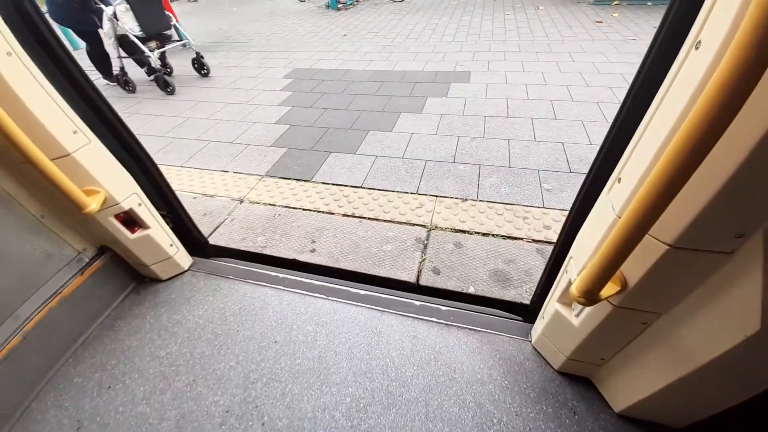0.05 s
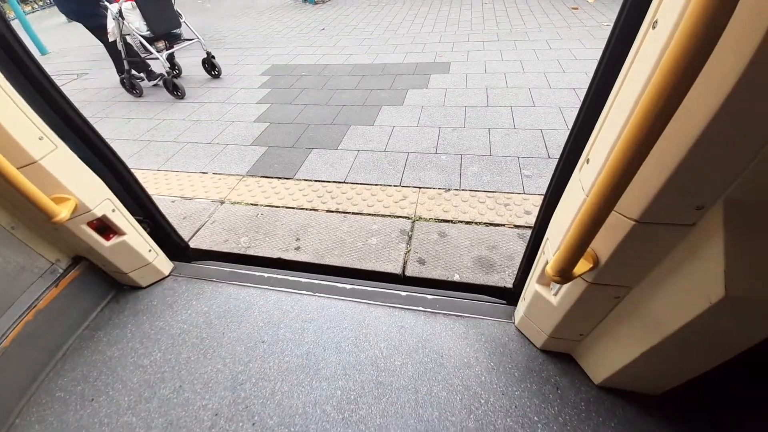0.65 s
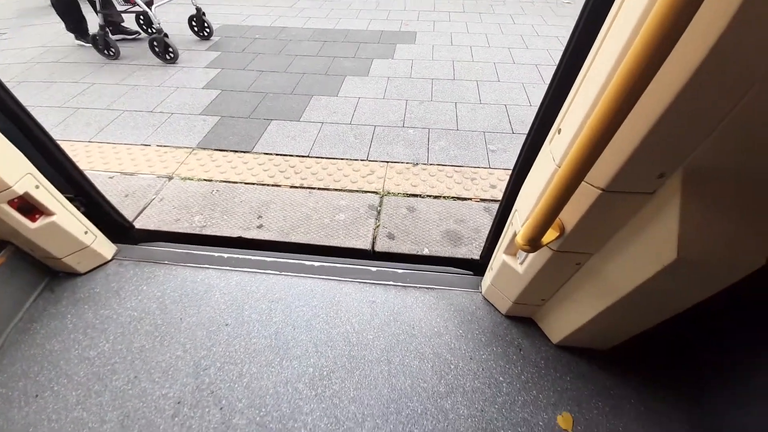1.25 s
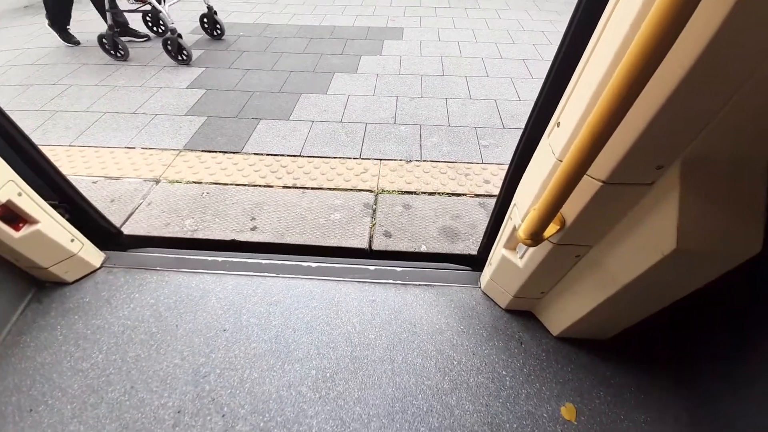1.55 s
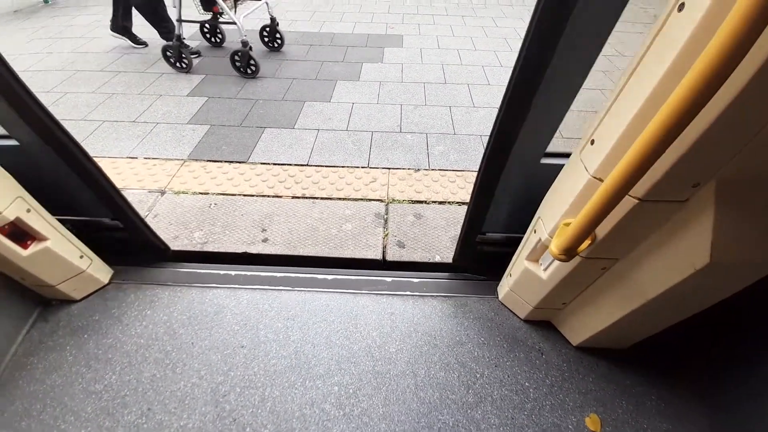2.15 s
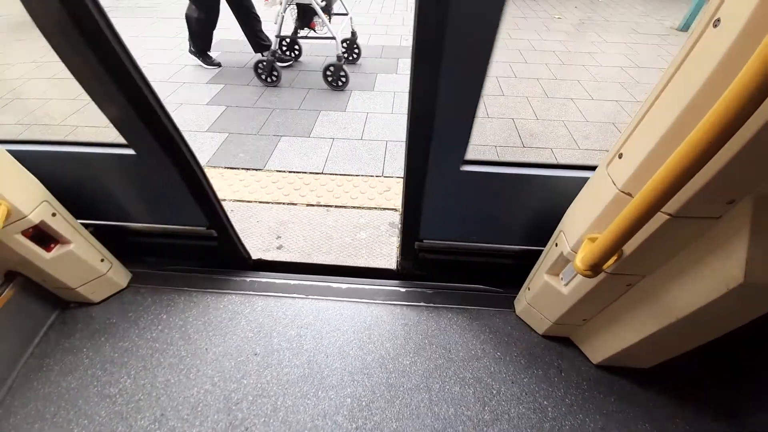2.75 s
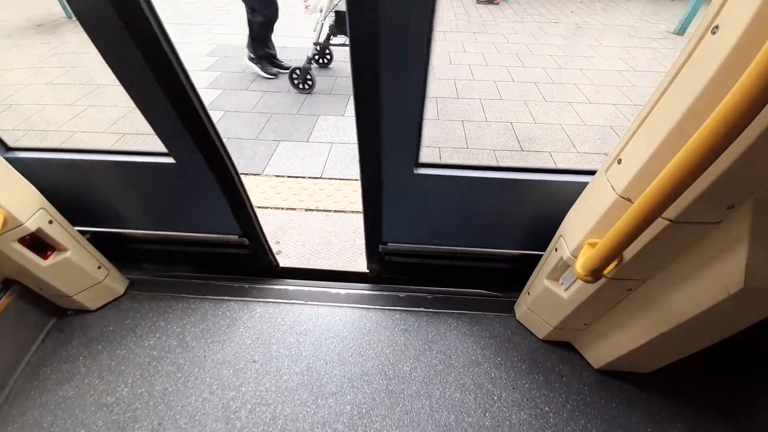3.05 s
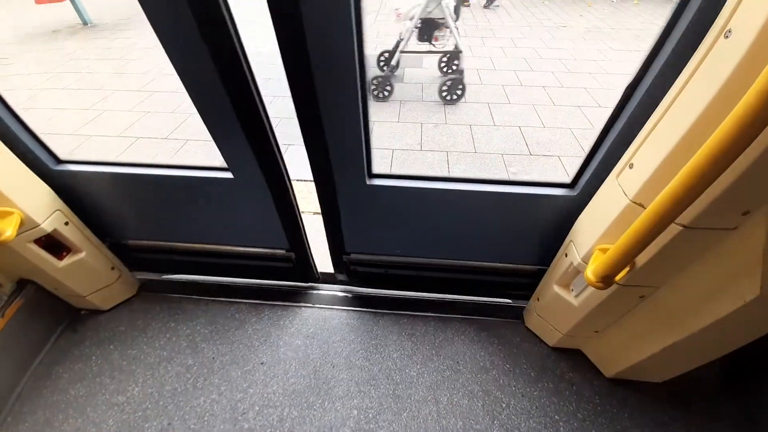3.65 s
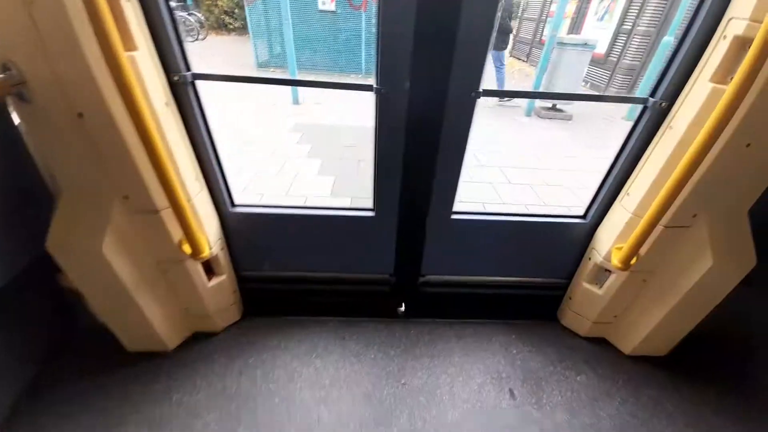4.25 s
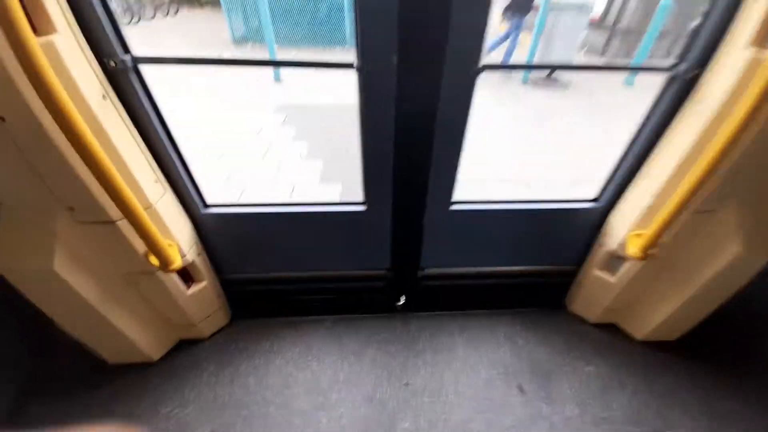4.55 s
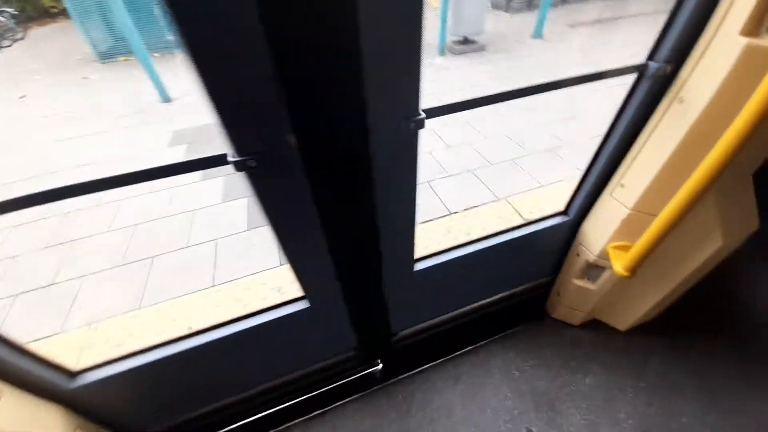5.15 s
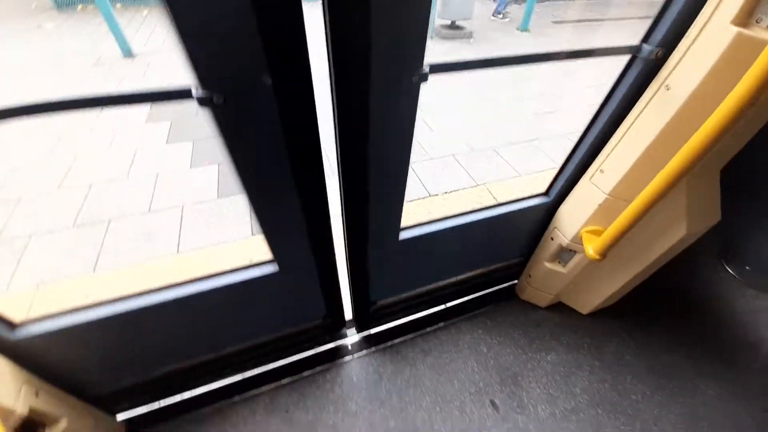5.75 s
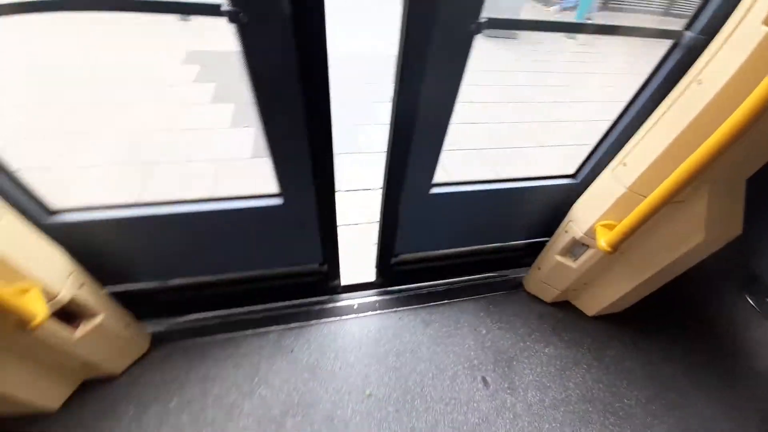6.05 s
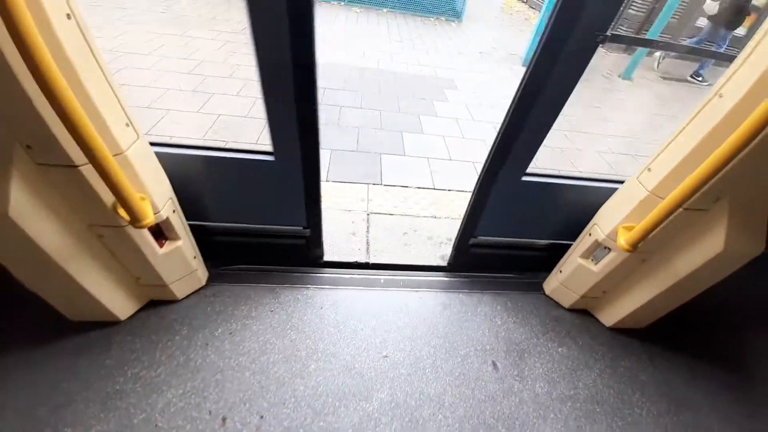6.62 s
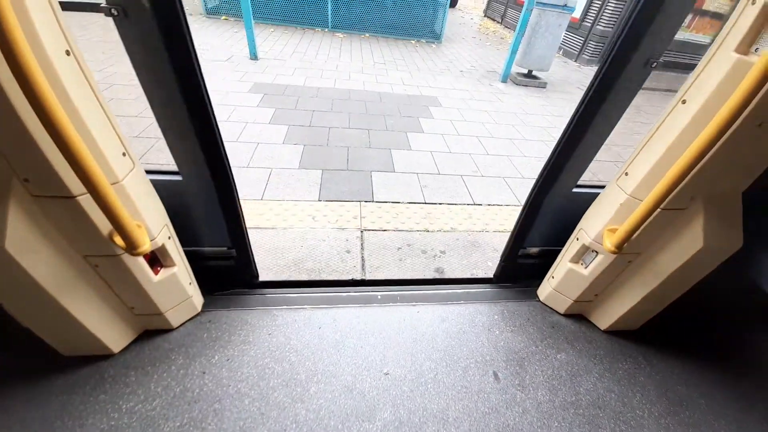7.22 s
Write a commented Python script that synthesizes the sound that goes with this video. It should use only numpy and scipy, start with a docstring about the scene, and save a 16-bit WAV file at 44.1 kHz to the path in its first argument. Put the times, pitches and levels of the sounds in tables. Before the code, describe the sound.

Inside a standing, humming tram, motor-driven doors close with knocks and steel snaps, pause, then unlock and reopen to a final knock.

```python
"""Inside a standing tram, over a low hum and ventilation: the electric doors unlock, roll shut and
pull into their seals with a clatter of steel latches. The slam breaks off abruptly. After a pause the
lock lets go with a thump, and the leaves roll open and knock against their end stops. Blows ring the
leaves, panels and fittings; rollers drum, a guide scrapes, and the seals and loaded drive squeak."""
import sys
import numpy as np
from scipy import signal
from scipy.fft import rfft, irfft, next_fast_len
from scipy.io import wavfile
from scipy.ndimage import uniform_filter1d

SR = 44100
rng = np.random.default_rng(int(sys.argv[2]) if len(sys.argv) > 2 else 0)


def output_pcm(signal):
    """Save a mono or channel-first signal as 16-bit PCM at the path in sys.argv[1].

    Samples are clipped to [-1, 1] before scaling.
    """
    pcm = np.clip(np.atleast_2d(signal).T, -1, 1) * 32767
    wavfile.write(sys.argv[1], SR, np.round(pcm).astype(np.int16))


N = 329868
BREAK_S = 4.123  # the slam cuts off here

# Hits on the door leaves: (time [s], level [dB], hardness [0-1], looseness [dB],
# pitch of the struck fitting [Hz], its ring against the hit [dB])
DOOR_HITS = [(0.45, -48.5, .25, -2, 300, 3), (0.72, -43.5, 0.5, 0, 98, 13),
             (1.396, -31, 0.4, -6, 135, 15.5), (1.397, -40.5, 0.3, -4, 846, 3.5),
             (1.558, -31, 0.72, 3, 1077, -0.5), (1.584, -29.5, 0.7, -4.5, 880, -2),
             (1.609, -30, 0.14, -4, 305, 7.5), (2.549, -38, .5, 4, 610, -4),
             (2.916, -25.5, 0.77, -16, 1110, -5), (2.93, -21, 0.5, -11.5, 598, 0),
             (3.333, -26.5, 0.8, -19, 2110, 10), (3.336, -25, 0.94, 9, 704, 0),
             (3.37, -22, 0.9, 12, 465, -1.5), (3.648, -20, 0.53, 5, 1354, -17),
             (3.739, -27.5, 0.04, 0, 102, -2), (3.776, -19, .72, 1, 912, -4),
             (3.896, -15, 0.83, -8.5, 968, -1), (3.899, -17.5, 0.18, -24, 199, 13),
             (3.904, -33, 0.4, 10, 70, 15), (3.911, -16.5, 0.81, -3.5, 1140, 3.5),
             (3.913, -17, 0.86, 0, 1283, 0), (3.992, -16.5, 0.93, 12, 2077, -12),
             (4.051, -14, 0.73, -5.5, 715, 1.5), (4.056, -26.5, .4, 13, 338, 12.5),
             (4.501, -56.5, 0.16, 13, 94.7, 19.5), (4.617, -43.5, 0.83, -11, 990, -2),
             (5.329, -12.5, 0.49, -5, 284, 4.5), (5.331, -27.5, 1, 1, 3500, -9.5),
             (5.341, -13, 0.49, -3, 340, 0), (5.345, -22.5, 0.23, 6, 111, 9),
             (5.456, -32, 0.93, -12.5, 5570, -5), (5.59, -25, 0.72, -2, 1097, -3),
             (5.731, -29.5, 0.96, -6, 377, 6), (6.809, -16.5, 0.74, -6, 1220, -3.5),
             (6.834, -21.5, 0.56, -7, 287, -7), (7.015, -26, 0.56, -3, 240, 9.5)]
# Tone of the rattling panels: (frequency [Hz], level [dB])
PANEL_TONE = [(40, -13), (70, 3.5), (150, 4.5), (230, 4.5), (330, 9), (520, -4), (1200, -10), (1700, -14),
              (3000, -24.5), (5000, -28.5), (7000, -29), (8300, -40.5), (12500, -36), (16000, -47)]
def knocks(ring_db=-7, tail_db=-6, burst_t60=0.047, attack_s=0.0012, rebound_s=0.028):
    """Each hit and its soft rebound ring the leaf and panels; harder hits trade thud for crack."""
    out, t = np.zeros((2, N)), np.arange(SR // 3) / SR
    edges_hz = [(40, 200), (200, 700), (700, 2500), (2500, 16000)]
    bands = [signal.butter(3, edge, "band", fs=SR, output="sos") for edge in edges_hz]
    transient = t < .03
    rebounds = [(s + rebound_s, db - 10.5, 0.29, -10.5) for s, db, *_ in DOOR_HITS]
    for s, db, hardness, loose_db, *_ in list(DOOR_HITS) + rebounds:
        burst = noise(PANEL_TONE, len(t), ripple_db=5) * amp(-60 * t / burst_t60)
        ring = amp(tail_db) * cabin_tail(PANEL_TONE, len(t)) + amp(ring_db) * leaf_ring(t)
        hit = (burst + amp(loose_db) * ring) * (1 - np.exp(-t / attack_s))
        thud_db, body_db = -21 * hardness, -6.5
        clack_db, crack_db = -30.5 + 26.5 * hardness, -47 + 37 * hardness
        for band, band_db in zip(bands, (thud_db, body_db, clack_db, crack_db)):
            layer = signal.sosfilt(band, hit)
            add(out, s, amp(db + band_db) * layer / layer[:, transient].std())
    return out * amp([[-.5], [.5]])


def fittings(t60=.14):
    """Each hit singles out one panel or fitting, which booms or pings; loose ones ring longer."""
    out = np.zeros((2, N))
    for s, db, _, loose_db, hz, ring_db in DOOR_HITS:
        add(out, s, amp(db + ring_db) * ping(hz, t60 * amp(0.72 * loose_db)))
    return out


# Resonances of a door leaf: (frequency [Hz], level [dB], decay t60 [s])
LEAF_MODES = [(69.8, -6.5, 0.45), (95, -2, 0.14), (134.5, -25, 0.32), (177.4, -10.5, 0.31),
              (274.7, 5.5, 0.33), (334.8, -1, 0.27), (344.6, 1.5, 0.36), (442, -4, 0.29),
              (460.7, -3.5, 0.34), (615, -13.5, 0.6), (716, -10, 0.17), (798, -13.5, 0.3), (950, -16, 0.36),
              (1146, -22, 0.17), (1234, -28, 0.76), (1345, -10.5, 0.29), (1518, -27, 0.11),
              (2120, -24, 0.43), (2240, -37, 0.29)]
def leaf_ring(t, scatter_db=1.5):
    """The struck leaf rings in damped modes, balanced a little differently on every hit."""
    hz, db, t60 = np.transpose(LEAF_MODES)
    modes = amp(db[:, None] - 60 * t / t60[:, None]) * np.exp(2j * np.pi * hz[:, None] * t)
    strength, lead = rng.standard_normal((2, len(hz)))
    apart = stereo_angle(hz) * np.sign(lead)
    return (amp(scatter_db * strength) * np.exp(1j * np.array([apart, -apart])) @ modes).imag


# Latch snaps: (time [s], level [dB], sheen above 9 kHz [dB])
LATCH_SNAPS = [(1.509, -32, 5), (2.179, -33, 7), (3.35, -15.5, -6), (3.373, -14, -4), (3.399, -14, -6),
               (3.413, -17.5, -7), (3.899, -17.5, 14), (3.911, -10, 3), (3.988, -11, 2.5),
               (3.9959, -9.5, 3.5), (4.043, -10, 5), (4.0524, -15, 0), (4.72, -39, 3), (5.731, -23, 1),
               (7.252, -43, -6)]
# Tone of the steel latches: (frequency [Hz], level [dB])
STEEL_TONE = [(1760, -53), (3000, -9.5), (3650, -15.5), (4660, -13), (5400, -12), (6570, 0), (7100, -7.5),
              (7720, -8), (9800, -17.5), (13300, -12.5), (13900, -18), (15200, -15), (16000, -51)]
def latches(gain_db=-6, snap_t60=0.032, tail_db=-19, attack_s=0.00078):
    """Steel latches snap with a short bright ring that the cabin carries on."""
    out, t = np.zeros((2, N)), np.arange(SR // 4) / SR
    for s, db, sheen_db in LATCH_SNAPS:
        tone = [(hz, level + sheen_db * (hz > 9000)) for hz, level in STEEL_TONE]
        snap = noise(tone, len(t), ripple_db=4) * amp(-60 * t / snap_t60)
        tail = amp(tail_db) * cabin_tail(tone, len(t))
        add(out, s, amp(db + gain_db) * (snap + tail) * (1 - np.exp(-t / attack_s)))
    return out * amp([[-1], [1]])


# Pace of the closing leaves: (time [s], speed [dB])
CLOSING_SPEED = [(1.55, -17), (1.75, -12.5), (2.0, -7.5), (2.3, -1.5), (2.8, 1.5), (3.25, -4), (3.6, -5),
                 (3.85, 0.5), (4.12, -5)]
# Roller drumming on the way shut: (frequency [Hz], level [dB])
CLOSING_TONE = [(90, -53), (150, -3), (195, -1.5), (250, -2.5), (320, 2), (400, -5.5), (520, -11),
                (600, -8), (700, -14), (1000, -37), (2200, -85)]
def roll_shut():
    """The drive pulls the leaves shut, with a last push into the seals."""
    return travel(CLOSING_SPEED, CLOSING_TONE, roll_db=-31.5, rail_db=-42.5, slide_db=-44,
                  shudder_db=-45.5, motor_hz=329.4, motor_db=-8, uneven_db=1, guide_db=-22)


# Pace of the opening leaves; the last point is a quick fade-out as the sound ends:
# (time [s], level [dB])
OPENING_RIDE = [(5.42, -7), (5.66, -9.5), (5.79, -3.5), (6.05, -8), (6.45, -1.5), (6.75, 2), (7.1, -4.5),
                (7.42, -6), (7.48, -19)]
# Roller drumming on the way open: (frequency [Hz], level [dB])
OPENING_TONE = [(90, -32), (135, -0.5), (175, -9.5), (235, 3), (270, -3.5), (310, 1), (390, -2.5),
                (530, -12.5), (610, -7.5), (750, -15), (1000, -26), (2200, -83)]
def roll_open():
    """The leaves run back with a lower motor note and more rub from the guide."""
    return travel(OPENING_RIDE, OPENING_TONE, roll_db=-32, rail_db=-41.5, slide_db=-43.5,
                  shudder_db=-41, motor_hz=311.5, motor_db=-4.5, uneven_db=0.1, guide_db=-7.5)


# Tones of frame shudder, rail rattle, belt and brush hiss, guide rub: (frequency [Hz], level [dB])
FRAME_TONE = [(22, -40), (42, -18), (70, -4), (105, -3), (140, -12), (400, -100)]
RAIL_TONE = [(300, -60), (750, 4), (1000, 0.5), (1400, -3), (2000, -6.5), (3000, -13), (4500, -31),
             (9000, -60)]
SLIDE_TONE = [(1000, -1), (3000, -4.5), (3700, -3.5), (4400, -1), (6200, -2), (7300, -1), (8200, -11),
              (10000, -10), (12200, -7.5), (14000, -11.5), (16000, -19)]
GUIDE_TONE = [(3800, -42), (4900, -16), (5300, -6), (5800, -9), (6500, -10.5), (7400, -20), (8500, -38)]
def travel(pace, roller_tone, roll_db, rail_db, slide_db, shudder_db,
           motor_hz, motor_db, uneven_db, guide_db):
    """Rollers drum and rattle with speed and strain; belt, brushes and guide hiss with speed."""
    start, speed = pace[0][0], fader(pace)
    groan, shudder = strain()
    roll_gain = amp(roll_db) * speed + groan
    rail_gain = amp(rail_db) * speed ** 1.03 + amp(-19) * groan
    slide_gain = amp(slide_db) * speed ** 0.62
    bumps_db = uneven_db * wobble(35)  # an uneven track shakes the contacts together
    drumming = roll_gain * amp(bumps_db) * grains(roller_tone, rate=2500, spread_db=0.3)
    frame = (amp(shudder_db) + shudder) * noise(FRAME_TONE)
    rattle = rail_gain * amp(bumps_db) * grains(RAIL_TONE, rate=2200, spread_db=1, ripple_db=7)
    hiss = slide_gain * amp(.5 * bumps_db + 1.4 * wobble(120)) * noise(SLIDE_TONE, ripple_db=2.5)
    guide = slide_gain * amp(guide_db + 1.7 * wobble(25)) * noise(GUIDE_TONE, ripple_db=6.5)
    rumble = (drumming + frame) * amp([[-.8], [.8]])
    rubbing = patchy(rattle + (hiss + guide) * amp([[-.7], [.7]]))
    drone = roll_gain * amp(motor_db) * motor(motor_hz)
    return spin_up(start, rumble + rubbing + drone) + jiggle(start, rail_gain)


# Moments of load on the drive: (time [s], length [s], groan [dB], frame shudder [dB])
DRIVE_LOADS = [(1.567, 0.072, -39.5, -41), (2.036, .1, -63, -34), (2.92, 0.36, -63, -41),
               (3.345, 0.18, -34.5, -33), (3.653, 0.19, -37.5, -41), (3.88, 0.073, -25, -23.5),
               (4.011, 0.092, -28, -31), (5.413, 0.052, -47, -29), (5.614, 0.02, -39, -33),
               (6.405, 0.068, -52, -45)]
def strain(attack_s=.018, release_s=0.037):
    """Groan and shudder envelopes: the drive labours through a bend or against the seals."""
    envelopes = []
    for s, length, *_ in DRIVE_LOADS:
        t = np.arange(N) / SR - s
        release = np.exp(-np.clip((t - length) / release_s, 0, 20))
        envelopes.append(np.clip(t / attack_s, 0, 1) * release)
    return amp([row[2:] for row in DRIVE_LOADS]).T @ np.array(envelopes)


def motor(hz, waver=.045, throb_db=3):
    """The drive drones unsteadily as its load changes."""
    phase = 2 * np.pi * np.cumsum(hz * (1 + waver * wobble(22))) / SR
    return unit(amp(throb_db * wobble(25)) * np.sin(phase + [[.3], [-.3]]))


def spin_up(start, sound, attack_s=0.036):
    """The drive's sound fades in as it starts to turn."""
    out = np.zeros((2, N))
    fade_in = np.clip((np.arange(N) / SR - start) / attack_s, 0, 1)
    add(out, start, (fade_in * sound)[:, round(start * SR):])
    return out


def patchy(pair, depth_db=2.5):
    """Contacts come and go, each lifting a narrow band for a moment."""
    spectra = signal.stft(pair, nperseg=512)[2]
    patches = rng.standard_normal(spectra.shape[1:])
    for axis in (0, 1):
        patches = uniform_filter1d(patches, size=4, axis=axis)
    gain = unit(amp(depth_db * np.clip(unit(patches), -2, 2)))
    return signal.istft(spectra * gain, nperseg=512)[1][:, :N]


def jiggle(start, rail_gain, gain_db=-4.5, centre_hz=1398, octaves=.5, spread_db=4, count=80):
    """Small parts tick at random while the leaves travel, as loud as the rail shakes them."""
    out = np.zeros((2, N))
    times = rng.uniform(start, N / SR if start > BREAK_S else BREAK_S, count)
    for s, (pitch, size) in zip(times, np.clip(rng.standard_normal((count, 2)), -2, 2)):
        tick = ping(centre_hz * 2 ** (octaves * pitch), t60=0.08)
        add(out, s, rail_gain[int(s * SR)] * amp(gain_db + spread_db * size) * tick)
    return out


# Squeaks, mostly rubber seals and loaded drive: (time [s], length [s], pitch [Hz], level [dB])
SQUEAK_CUES = [(0, 0.08, 597, -48), (2.525, 0.16, 595.6, -38), (3.42, 0.17, 465, -36.5),
               (3.633, 0.067, 1343, -39), (3.639, 0.068, 2120, -46), (3.651, 0.12, 1695, -47.5),
               (3.719, 0.056, 1353, -37.5), (3.864, 0.013, 2770, -38.5), (3.934, 0.086, 345, -27),
               (4.058, 0.075, 341, -23)]
def squeaks(waver=0.015, rough_db=3):
    """Stick and slip makes short unsteady tones."""
    out = np.zeros((2, N))
    for s, length, hz, db in SQUEAK_CUES:
        n = round(length * SR)
        phase = 2 * np.pi * np.cumsum(hz * (1 + waver * wobble(89, n))) / SR
        slips = unit(amp(rough_db * wobble(hz / 6, n)))  # the grip changes every few cycles
        add(out, s, amp(db) * np.sqrt(2) * slips * signal.windows.tukey(n, .7) * np.sin(phase))
    return out


# Spurts of scraping from the guide: (centre time [s], length [s], pitch [Hz], level [dB])
SCRAPE_CUES = [(1.9, 0.17, 5430, -54), (2.434, 0.09, 6100, -43), (2.629, 0.074, 5700, -43),
               (2.77, .09, 5600, -52), (3.091, .09, 5500, -46), (5.766, .2, 5400, -41.5),
               (5.92, 0.23, 5300, -44.5), (6.133, 0.15, 5320, -43.5), (6.283, 0.076, 5800, -43),
               (6.466, 0.051, 5800, -46)]
def scrapes(rough_db=0.5, guide_hz=5500):
    """The guide catches and slips, with a bright rasp that shifts pitch from spurt to spurt."""
    out = np.zeros((2, N))
    for s, length, hz, db in SCRAPE_CUES:
        n = round(length * SR)
        tone = [(f * hz / guide_hz, level) for f, level in GUIDE_TONE]
        slips = amp(rough_db * wobble(90, n))
        rasp = unit(slips * grains(tone, rate=2000, spread_db=1, ripple_db=6, n=n))
        add(out, s - length / 2, amp(db) * signal.windows.hann(n) * rasp)
    return out


# Tones of the low rumble and the ventilation: (frequency [Hz], level [dB])
RUMBLE_TONE = [(15, -51), (25, -30), (38, -5.5), (70, -0.5), (97, 0.5), (150, -3), (168, -8.5), (288, -7.5),
               (370, -10.5), (500, -18), (650, -36), (1100, -120)]
AIR_TONE = [(150, -42), (400, -12.5), (600, -6), (1000, -10.5), (1500, -11), (3500, -15.5), (7300, -17.5),
            (8300, -25), (12000, -21), (16000, -32)]
def room_tone(rumble_db=-50, air_db=-53, duck_db=-9, recover_s=0.22):
    """A bed of equipment rumble and ventilation that ducks at the break, then recovers."""
    since_break = np.arange(N) / SR - BREAK_S
    hush_db = duck_db * (since_break > 0) * np.exp(-np.abs(since_break) / recover_s)
    air = amp(air_db + .7 * wobble(14)) * noise(AIR_TONE, ripple_db=3)
    rumble = amp(rumble_db + 0.58 * wobble(12)) * noise(RUMBLE_TONE)
    return amp(hush_db) * (air + rumble)


# Partials of the electrical hum: (frequency [Hz], level [dB])
HUM_PARTIALS = [(101.5, -57), (300, -72), (329, -73), (409, -79), (490, -76)]
# Rise and fall of the hum: (time [s], gain [dB])
HUM_RIDE = [(0, -7.5), (1.2, 8.5), (1.8, 14.5), (4.2, 1), (5.3, 9.5), (7.48, -10)]
def hum():
    """Electrical equipment hums in a few slightly wavering tones."""
    out, t = np.zeros(N), np.arange(N) / SR
    for hz, db in HUM_PARTIALS:
        gain = np.sqrt(2) * amp(db + 0.86 * wobble(12))
        out += gain * np.sin(2 * np.pi * hz * t + 0.83 * wobble(3.6))
    return fader(HUM_RIDE) * out


# Swells of hiss in the car: (centre time [s], half length [s], level [dB], tilt [dB/octave])
HISS_SWELLS = [(0.017, 0.095, -48, 1), (0.22, 0.076, -49.5, 0), (0.671, 0.084, -48.5, 2),
               (0.798, 0.026, -50.5, 3.5), (4.315, 0.041, -56, 0), (5.037, .16, -47.5, 1.5)]
def rushes(flutter_db=1):
    """Soft hiss swells and fades, some of it duller, some brighter."""
    out = np.zeros((2, N))
    for s, half, db, tilt in HISS_SWELLS:
        n = min(round((s + 3 * half) * SR), N)
        tone = [(hz, level + tilt * np.log2(hz)) for hz, level in AIR_TONE]
        bell = np.exp(-((np.arange(n) / SR - s) / half) ** 2 / 2)
        out[:, :n] += amp(db + flutter_db * wobble(30, n)) * bell * noise(tone, n)
    return out


# Reverb of the cabin: (frequency [Hz], decay t60 [s])
CABIN_DECAY = [(60, 0.78), (300, 0.24), (1100, 0.35), (3000, 0.42), (7000, 0.37), (15000, 0.29)]
def cabin_tail(tone, n):
    """Dense ringing in which each frequency dies at the cabin's own speed."""
    hz, t, spectra = signal.stft(noise(tone, n, ripple_db=8.5), SR, nperseg=256)
    decay = amp(-60 * t / along(CABIN_DECAY, hz)[:, None])
    return signal.istft(spectra * decay, SR, nperseg=256)[1][:, :n]


# Stereo image of the cabin: (frequency [Hz], left-right correlation [-1 to 1])
STEREO_IMAGE = [(60, 0.91), (200, 0.99), (380, 0.81), (700, 0.42), (1200, -0.13), (2400, 0.056),
                (15000, 0.088)]
def stereo_angle(hz):
    """Mid/side angle in radians: bass sits in the centre, treble spreads wide."""
    return np.arccos(np.clip(along(STEREO_IMAGE, hz), -1, 1)) / 2


def coloured(pair, tone, ripple_db, spacing_hz=55):
    """Two unrelated signals become an equalised stereo field of rms 1."""
    n = pair.shape[1]
    size = next_fast_len(n + 2048, real=True)
    hz = np.fft.rfftfreq(size, 1 / SR)
    angle = stereo_angle(hz)
    knots = np.clip(rng.standard_normal(1024), -1.6, 1.6)  # crowded resonances of panels and glass
    ripple = np.interp(hz / spacing_hz, np.arange(len(knots)), knots) * hz / (hz + 600)
    eq = amp(along(tone, hz) + ripple_db * ripple)
    mid, side = irfft(rfft(pair, size) * eq * [np.cos(angle), np.sin(angle)], size)[:, :n]
    return unit(np.array([mid + side, mid - side]))


def noise(tone, n=N, ripple_db=0):
    """Stereo noise with a given tone."""
    return coloured(rng.standard_normal((2, n)), tone, ripple_db)


def grains(tone, rate, spread_db, ripple_db=0, n=N):
    """Tiny contacts of uneven size, rate a second, ringing with a given tone."""
    hits = (rng.random(n) < rate / SR) * amp(spread_db * np.clip(rng.standard_normal(n), -2, 2))
    return coloured(hits * rng.standard_normal((2, n)), tone, ripple_db)


def ping(hz, t60, flutter=0.59):
    """One small part rings out, trembling in its mount."""
    t = np.arange(int(t60 * SR) + 1) / SR
    apart = stereo_angle(hz) * rng.choice([-1, 1])
    phase = 2 * np.pi * hz * t + flutter * wobble(hz / 10, len(t))
    return amp(-60 * t / t60) * (1 - np.exp(-t * hz)) * np.sin(phase + [[apart], [-apart]])


def add(track, s, sound):
    """Mix a sound in at time s; whatever starts before the break ends there."""
    start = round(s * SR)
    end = round(BREAK_S * SR) if s < BREAK_S else N
    part = sound[..., :max(end - start, 0)]
    track[:, start:start + part.shape[-1]] += part


def amp(db):
    """Decibels to gain."""
    return 10 ** (np.asarray(db) / 20)


def unit(x):
    """Scale to rms 1."""
    return x / np.sqrt(np.mean(x ** 2) + 1e-20)


def along(points, hz):
    """Read a (frequency [Hz], value) curve on a log axis."""
    freqs, values = np.transpose(points)
    return np.interp(np.log(hz + 1), np.log(freqs + 1), values)


def fader(points):
    """A (time [s], level [dB]) curve as one gain per sample."""
    return amp(np.interp(np.arange(N) / SR, *np.transpose(points)))


def wobble(rate, n=N):
    """A smooth random curve, rate knots a second."""
    fine = signal.resample_poly(rng.standard_normal(int(n * rate / SR) + 4), 10, 1)
    return np.interp(np.arange(n) * rate * 10 / SR, np.arange(len(fine)), fine)


def scene():
    """The doors shut and reopen over the bed of the humming car."""
    doors = roll_shut() + roll_open() + scrapes() + knocks() + latches() + squeaks() + fittings()
    return doors + hum() + room_tone() + rushes()


def record(dry):
    """A brick-wall low-pass trims the very top of the mix."""
    size, top_hz = next_fast_len(N + 8192), 15850
    passband = np.fft.rfftfreq(size, 1 / SR) < top_hz
    return irfft(rfft(dry, size) * passband, size)[:, :N]


dry = scene()
out = record(dry)
output_pcm(out)
```